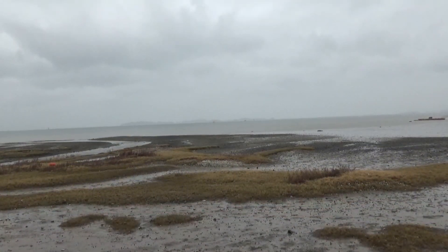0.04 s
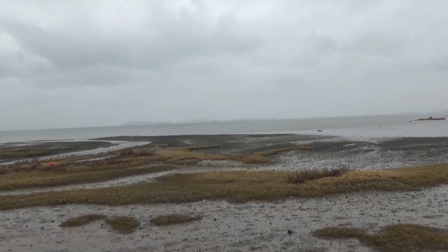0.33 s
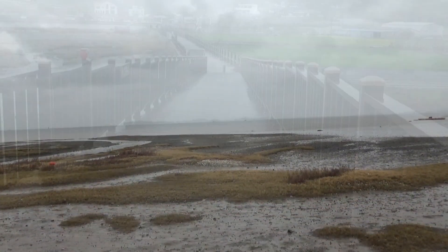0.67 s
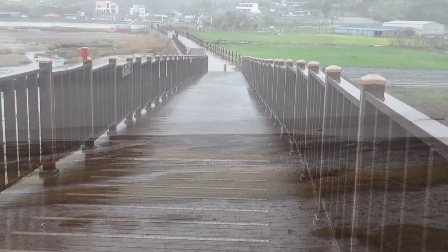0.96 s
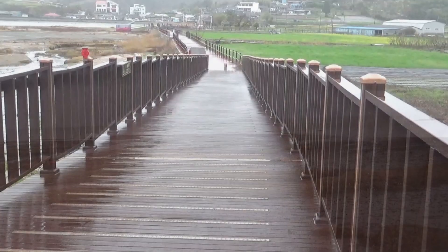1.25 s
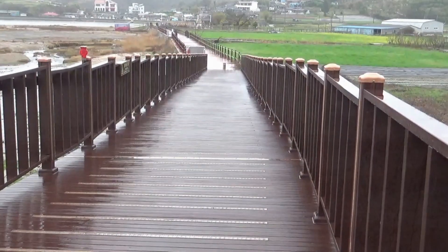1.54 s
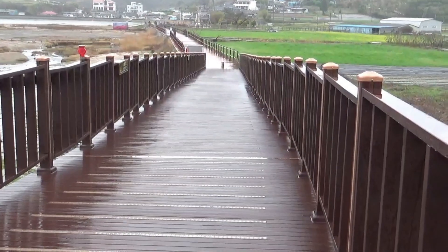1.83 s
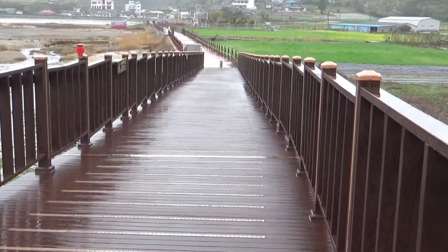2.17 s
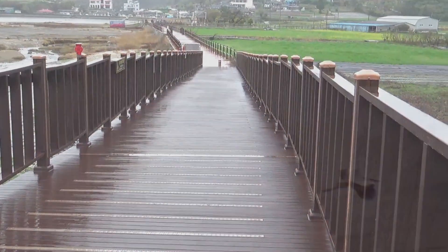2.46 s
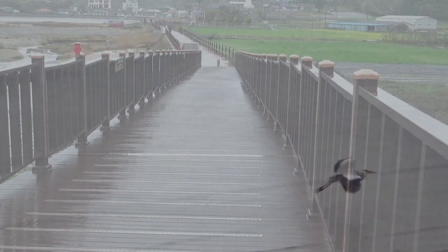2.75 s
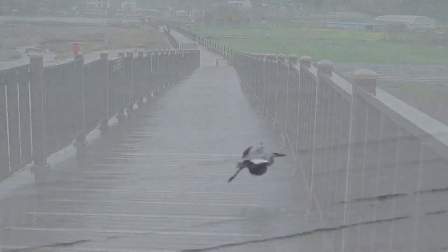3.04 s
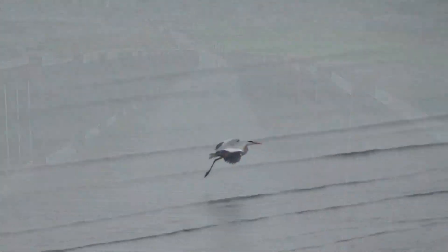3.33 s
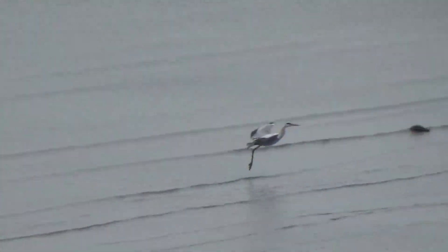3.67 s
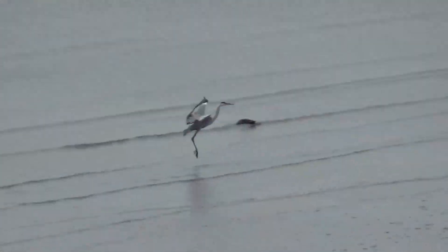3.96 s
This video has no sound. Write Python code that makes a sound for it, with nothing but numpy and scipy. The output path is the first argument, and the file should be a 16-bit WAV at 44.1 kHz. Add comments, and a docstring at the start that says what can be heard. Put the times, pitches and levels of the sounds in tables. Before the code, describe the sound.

Raindrops tick sharply on the tight cloth of an umbrella, heard from close underneath. The patter swells and eases with the gusts, mixed with heavier taps, a soft wash of surrounding rain and faint wind thumps on the microphone.

```python
"""Rain on an umbrella

Wind-driven rain patters on tight fabric, most likely an umbrella just above the microphone.
Each drop is a sharp tick with a brief flutter of the cloth. Gusts bring more and harder drops.
Heavy taps stand out, and tiny droplets add a thin crackle. A soft wash of rain lies behind,
and swirls of wind rumble and thump lightly on the microphone."""
import sys
import numpy as np
from scipy import signal
from scipy.fft import rfft, irfft
from scipy.io import wavfile
from scipy.ndimage import uniform_filter1d

SR = 44100
rng = np.random.default_rng(int(sys.argv[2]) if len(sys.argv) > 2 else 0)


def file_out(sig):
    """Save sig as 16-bit WAV at sys.argv[1]."""
    # one column per channel
    cols = np.atleast_2d(sig).T
    # limit, then scale
    lim = np.clip(cols, -1, 1)
    pcm = np.round(lim * 32767).astype(np.int16)
    wavfile.write(sys.argv[1], SR, pcm)


N = 176400  # 4 seconds

# How hard the gusts drive the rain. Each row: time in seconds, strength in dB.
GUST_STRENGTH = [(0.0, -52), (0.13, -57), (0.17, -47), (0.44, -47.5), (0.7, -43), (0.78, -45), (0.98, -44),
                 (1.105, -52.5), (1.15, -48), (1.45, -48.5), (1.7, -52.5), (1.84, -50.5), (2.11, -52),
                 (2.15, -46), (2.3, -43.5), (2.425, -49), (2.47, -44.5), (2.68, -42.5), (2.78, -48.5),
                 (3.12, -48), (3.22, -53), (3.4, -50), (3.625, -53.5), (3.7, -48), (3.85, -46), (4.0, -41)]
DROP_DB_PER_GUST_DB = 0.63
RING_HZ, RING_DB, FLUTTER_DB = 1940, 8, -1.5  # how an ordinary drop rings and shakes the cloth
DULL_RATIO = 2.92  # a hit loses treble above about this many times its pitch


def patter(level_db=-47, flutter_s=0.0024):
    """Countless small drops hit the cloth; a gust makes them both denser and harder."""
    times = drop_times(per_s=520)
    weight, pitch, hardness, side = rng.standard_normal((4, len(times)))
    db = np.minimum(9.5 * weight, 11) + DROP_DB_PER_GUST_DB * curve(GUST_STRENGTH, times)
    hz = np.maximum(RING_HZ * 2 ** (0.78 * pitch), 1030)
    dull_hz = hz * DULL_RATIO * 2 ** (0.77 * hardness)
    pan_db = 0.5 * side - 1  # slightly to the right
    ticks = cloth_ticks(hz, dull_hz, pan_db, RING_DB, FLUTTER_DB, flutter_s)
    return undb(level_db) * unit(place(times, db, ticks))


def heavy_taps(tap_s=0.0032, flutter_s=0.0014, tight_hz=2500, splash_s=0.002, splash_db=-11.5):
    """Heavy drops hit the cloth and quickly still it; two fragments of each land a moment later."""
    # Each row: start in seconds, level in dB (averaged over tap_s), pitch in Hz, left minus right in dB.
    heavy_drops = [(0.0208, -38.0, 1370, -0.1), (0.0512, -40.9, 1230, 5.3), (0.0971, -41.2, 3200, -5.2),
                   (0.1559, -38.7, 1450, -4.7), (0.1806, -33.0, 3400, 2.0), (0.3227, -41, 2140, -1),
                   (0.3388, -40, 2340, -6), (0.4757, -34.9, 2170, -7.2), (0.4895, -36.7, 1480, -0.7),
                   (0.5467, -34.8, 2170, 1.5), (0.5681, -35.5, 1940, -1.8), (0.6003, -37, 850, 0),
                   (0.6017, -32.3, 2800, 0.3), (0.6521, -37.5, 2000, 5.6), (0.6685, -36.5, 2520, -1.0),
                   (0.7086, -35.3, 1510, 1.1), (0.739, -37.8, 1580, -0.1), (0.7433, -34.3, 1900, 5.4),
                   (0.8004, -36.2, 1750, 1.6), (0.9058, -36.3, 1840, 0.2), (0.9522, -36.4, 1260, -2.7),
                   (1.0008, -34.3, 1660, 5.8), (1.0715, -38.3, 3330, -1.8), (1.1576, -39.1, 1640, 0.5),
                   (1.4519, -42.8, 1550, -1), (1.5116, -42, 2350, -5), (1.7221, -43.8, 2500, -2),
                   (1.8844, -39.5, 2740, -0.5), (1.9106, -37.2, 1810, -3.7), (1.9441, -34.7, 1080, -4.8),
                   (2.0221, -36.8, 1610, -0.8), (2.1309, -38.1, 1570, 5.1), (2.147, -36.2, 1440, 3.8),
                   (2.1728, -35.0, 2200, -5.5), (2.2105, -38.8, 2890, -6), (2.2338, -39.1, 1520, -8),
                   (2.2464, -33.9, 2540, -3.1), (2.257, -36.6, 2550, -6.2), (2.3068, -35.4, 3130, -5.0),
                   (2.4458, -33.3, 2330, -5.5), (2.4559, -33.8, 2420, -0.0), (2.4657, -34.1, 2170, -2.1),
                   (2.5246, -33.2, 1990, -3.3), (2.5639, -37.6, 3510, -3.1), (2.6002, -34.5, 1600, -2.6),
                   (2.6798, -36.4, 2250, -0.3), (2.8103, -40.1, 1660, -2), (2.8621, -41.7, 2330, -2),
                   (3.1128, -38.5, 1670, 1), (3.4781, -34.0, 3500, -1.3), (3.5798, -44, 3400, -3),
                   (3.6946, -40.5, 2530, -7.5), (3.7425, -37.3, 1800, 2.3), (3.7664, -39.0, 2620, -4.7),
                   (3.7869, -40.8, 2210, 5), (3.8083, -35.8, 1980, 1), (3.8119, -35.8, 2400, 3.8),
                   (3.8908, -35.2, 2030, 5.6)]
    times, db, hz, pan_db = np.array(heavy_drops).T
    ring_db = 7 + 12 * np.maximum(np.log2(hz / tight_hz), 0)  # tight cloth rings more clearly
    ticks = cloth_ticks(hz, hz * DULL_RATIO, pan_db, ring_db, flutter_db=-3.5, flutter_s=flutter_s)
    out = place(times, db, ticks)
    for _ in range(2):
        delay = splash_s * rng.uniform(0, 2, len(times))
        splash_hz = hz * 2 ** (0.5 * rng.standard_normal(len(times)))
        splash = cloth_ticks(splash_hz, splash_hz * DULL_RATIO, pan_db, RING_DB, FLUTTER_DB, flutter_s)
        out += place(times + delay, db + splash_db, splash)
    return np.sqrt(tap_s * SR) * out


def cloth_ticks(hz, dull_hz, pan_db, ring_db, flutter_db, flutter_s, smear_hz=5100, size=1024):
    """One stereo tick per drop, all equally strong: a hit, a short ring and a flutter of the cloth."""
    # The tone of the cloth. Each row: frequency in Hz, relative level in dB.
    cloth_tone = [(100, -29.5), (250, -15.5), (400, -8), (650, -3.5), (1000, -2), (2400, -5), (4100, -4),
                  (5200, -9.5), (6300, -8.5), (9600, -12), (11000, -17), (12000, -58)]
    t, f = np.arange(size) / SR, np.fft.rfftfreq(size, 1 / SR)
    channel_db = np.outer(pan_db, [1, -1])[:, :, None] / 2
    hit = undb(channel_db * f / np.hypot(f, 800))  # the bass stays in the middle
    fade = np.exp(-t / flutter_s)
    ripple = rfft(rng.standard_normal((len(hz), 2, size)) * fade / np.linalg.norm(fade))
    side = ripple[:, 1:] * np.array([[1], [-1]]) * 0.72 * f / np.hypot(f, 1700)  # wider in the treble
    flutter = undb(flutter_db) * (ripple[:, :1] + side) / (1 + 1j * f / 4770)  # softer above 4770 Hz
    s = 1j * f / hz[:, None, None]  # frequency relative to each drop's pitch
    sharpness = 2.02 * hz[:, None, None] / RING_HZ  # every ring dies in the same time
    ring = 1 + undb(np.reshape(ring_db, (-1, 1, 1))) * s / (s + sharpness * (1 + s * s))
    dulling = 1 / (1 + 1j * f / dull_hz[:, None, None])
    lag = 1 - (f / smear_hz) ** 2 + 1j * f / (smear_hz * 1.07)
    smear = np.conj(lag) / lag  # the cloth spreads each hit slightly in time
    ticks = irfft((hit + flutter) * ring * dulling * smear * tone_filter(cloth_tone, size))
    return ticks / np.linalg.norm(ticks.mean(1), axis=1)[:, None, None]


def spray(level_db=-67.5, pitch_hz=7020, ring_s=0.001, pan_db=7):
    """Tiny droplets each make a short ping, adding up to a thin, high crackle."""
    times, t = drop_times(per_s=600), np.arange(256) / SR
    weight, pitch, side = rng.standard_normal((len(times), 3)).T
    hz = pitch_hz * 2 ** (0.276 * pitch)
    pings = np.sin(2 * np.pi * np.outer(hz, t)) * np.exp(-t / ring_s)
    ticks = pings[:, None] * undb(np.outer(pan_db * side, [1, -1]) / 2)[:, :, None]
    db = 5.5 * np.minimum(weight, 2) + DROP_DB_PER_GUST_DB * curve(GUST_STRENGTH, times)
    return undb(level_db) * unit(place(times, db, ticks))


def rain_wash(flicker_db=1.48):
    """Rain on the ground all around blends into a soft hiss."""
    # How loud the hiss is. Each row: time in seconds, level in dB.
    hiss_level = [(0, -55.5), (.13, -56), (.3, -52.5), (.7, -50), (1.1, -52), (1.7, -55.5), (2.1, -51.5),
                  (2.3, -49.5), (2.7, -50.5), (3.38, -52), (3.62, -58.5), (4, -44.5)]
    # The tone of the hiss. Each row: frequency in Hz, relative level in dB.
    hiss_tone = [(60, -36), (200, -10.5), (450, -2.5), (900, 0), (1700, 0), (3700, -5.5), (5100, -11),
                 (6100, -13), (9400, -13.5), (11000, -23), (12000, -87)]
    db = curve(hiss_level, np.arange(N) / SR) + flicker_db * wander(per_s=24.74)
    return stereo_noise(hiss_tone, side_db=-2.5, side_hz=1520) * undb(db)


def wind_thumps(cycles=2.16):
    """Single swirls of air strike the microphone: a few low waves that swell and die."""
    # Each row: time of the peak in seconds, level in dB, middle frequency in Hz.
    swirls = [(.198, -57, 85), (.612, -60, 145), (.708, -54, 152), (.96, -60, 141), (1.401, -54, 150)]
    t, out = np.arange(N) / SR, 0
    for peak_s, db, hz in swirls:
        length_s = cycles / hz
        band = signal.butter(2, [0.65 * hz, 1.6 * hz], "bandpass", fs=SR, output="sos")
        swell = np.exp(-2 * ((t - peak_s) / length_s) ** 2)
        puff = signal.sosfilt(band, rng.standard_normal(N)) * swell
        out = out + undb(db) * puff * np.sqrt(length_s * SR / np.sum(puff ** 2))
    return out


def wind_rumble(flicker_db=2.5):
    """Swirling air rumbles on the microphone."""
    # How loud the wind is. Each row: time in seconds, level in dB.
    rumble_level = [(0, -75.5), (.21, -67.5), (.45, -77), (.58, -61), (.8, -71), (1.0, -72), (1.12, -88),
                    (1.28, -64.5), (1.54, -70), (1.62, -81), (2.24, -75), (2.68, -79), (2.85, -89.5),
                    (4, -88)]
    # The tone of the wind. Each row: frequency in Hz, relative level in dB.
    rumble_tone = [(25, -12), (60, -7), (100, -4), (160, -5.5), (220, -5.5), (400, -16.5), (1000, -73)]
    db = curve(rumble_level, np.arange(N) / SR) + flicker_db * wander(per_s=21.16)
    return stereo_noise(rumble_tone, side_db=-7, side_hz=22) * undb(db)


def drop_times(per_s, usual_gust_db=-46):
    """Random landing times: per_s drops a second at the usual gust strength, more above it."""
    t = np.arange(N) / SR
    rate = per_s * np.exp(0.1155 * (curve(GUST_STRENGTH, t) - usual_gust_db))
    drops_so_far = np.cumsum(rate) / SR
    count = int(drops_so_far[-1])
    jittered_order = (np.arange(count) + 4 * rng.standard_normal(count)) % count
    return np.interp(jittered_order, drops_so_far, t)


def place(times, db, ticks):
    """Add each tick to a stereo track at its own time and level."""
    out = np.zeros((2, N + ticks.shape[2]))
    starts = np.clip(times * SR, 0, N).astype(int)
    for start, gain, tick in zip(starts, undb(db), ticks):
        out[:, start:start + tick.shape[1]] += gain * tick
    return out[:, :N]


def stereo_noise(tone, side_db, side_hz):
    """Noise with the given tone that sounds wider above side_hz."""
    f = np.fft.rfftfreq(N, 1 / SR)
    mid, side = rfft(rng.standard_normal((2, N))) * tone_filter(tone, N)
    side = side * undb(side_db) * f / np.hypot(f, side_hz)
    return unit(irfft(np.array([mid + side, mid - side]), N))


def tone_filter(points, size):
    """A filter that follows (Hz, dB) points and fades out the bass around and below the first."""
    hz, db = np.array(points).T
    f = np.maximum(np.fft.rfftfreq(size, 1 / SR), 1)
    gain = undb(np.interp(np.log(f), np.log(hz), db)) * f / np.hypot(f, hz[0])
    # These steps keep the filter from sounding before it is struck.
    cepstrum = irfft(np.log(gain), size)
    cepstrum[1:size // 2] *= 2
    cepstrum[size // 2 + 1:] = 0
    return np.exp(rfft(cepstrum))


def wander(per_s):
    """A smooth random drift of typical size 1, with about per_s new values a second."""
    hold = int(SR / per_s)
    steps = np.repeat(rng.standard_normal(N // hold + 1), hold)
    return unit(uniform_filter1d(uniform_filter1d(steps, hold), hold)[:N])


def curve(rows, t):
    """Join the rows of a table with straight lines and read them at times t."""
    return np.interp(t, *np.array(rows).T)


def undb(db):
    """Turn decibels into a number to multiply by."""
    return 10 ** (np.asarray(db) / 20)


def unit(x):
    """Scale a signal to an average (rms) strength of 1."""
    return x / np.sqrt(np.mean(x ** 2))


def scene():
    """Wind and a wash of rain lie behind the drops on the cloth."""
    return wind_rumble() + wind_thumps() + rain_wash() + heavy_taps() + spray() + patter()


def record(dry, top_hz=11250):
    """The recorder cuts off the highest treble."""
    return signal.sosfilt(signal.ellip(10, 0.2, 70, top_hz, fs=SR, output="sos"), dry)


dry = scene()
out = record(dry)
file_out(out)
```